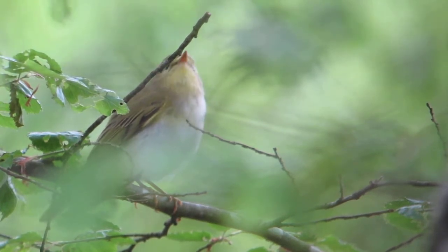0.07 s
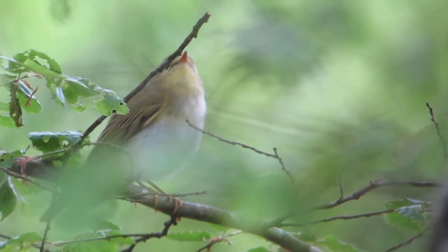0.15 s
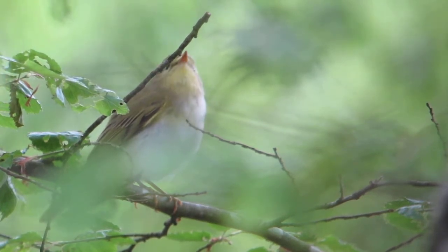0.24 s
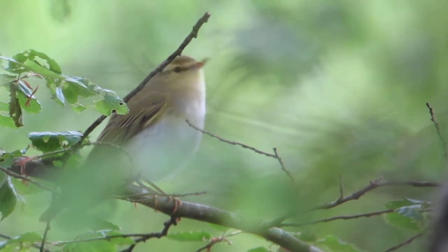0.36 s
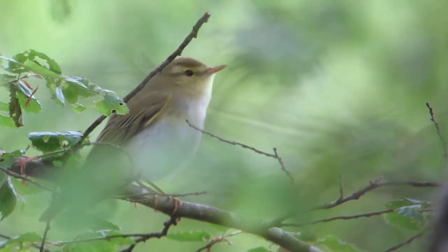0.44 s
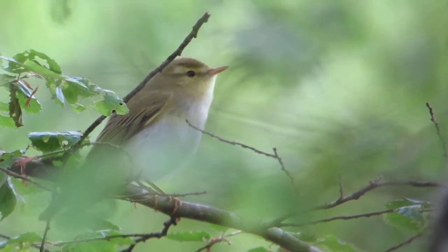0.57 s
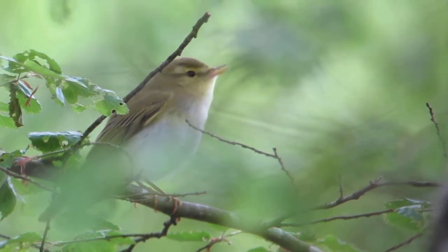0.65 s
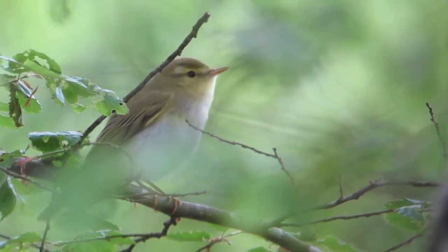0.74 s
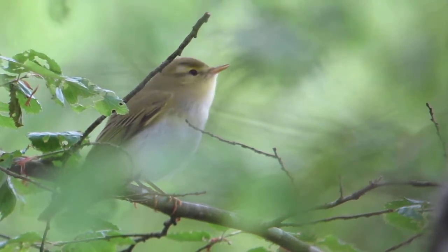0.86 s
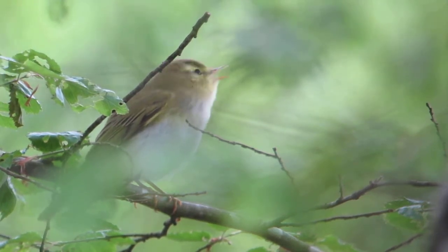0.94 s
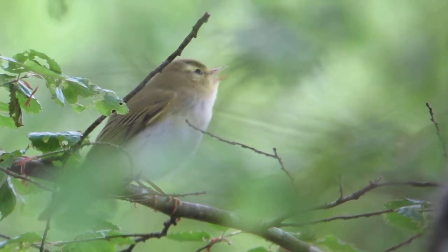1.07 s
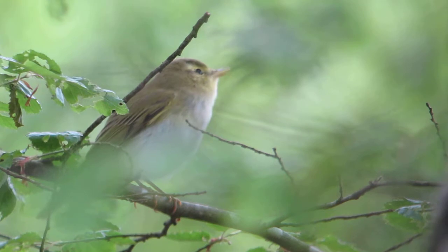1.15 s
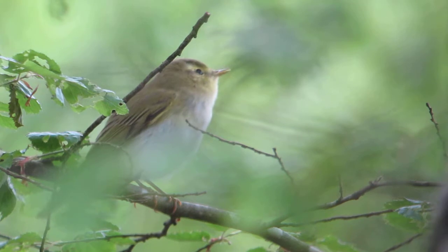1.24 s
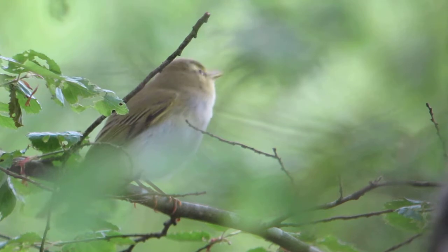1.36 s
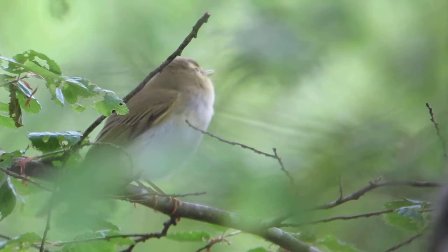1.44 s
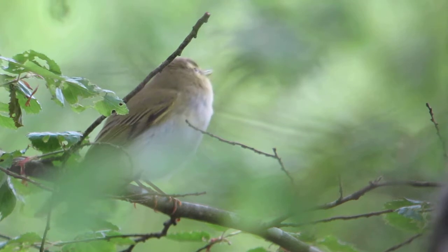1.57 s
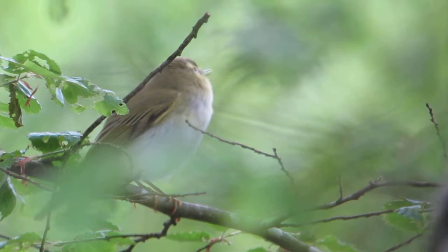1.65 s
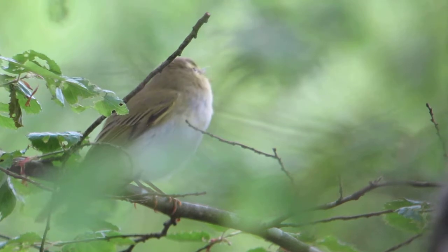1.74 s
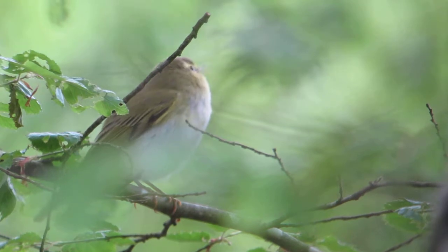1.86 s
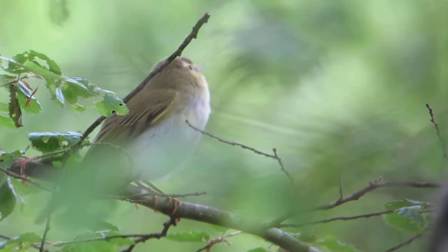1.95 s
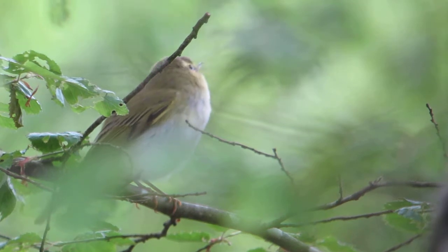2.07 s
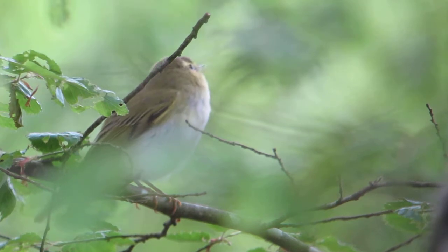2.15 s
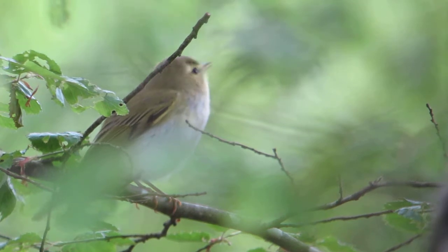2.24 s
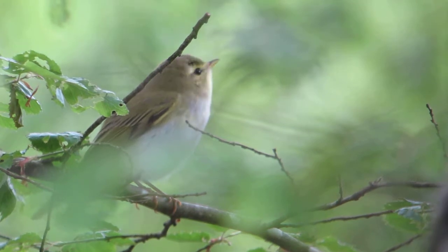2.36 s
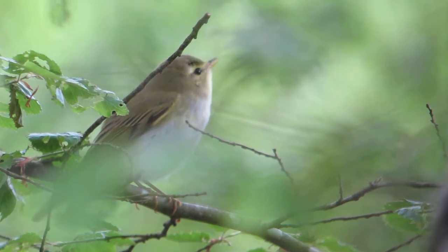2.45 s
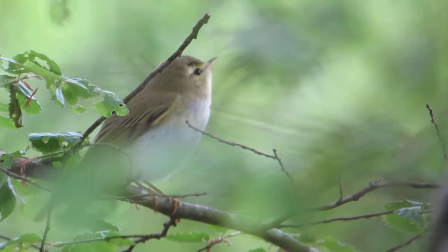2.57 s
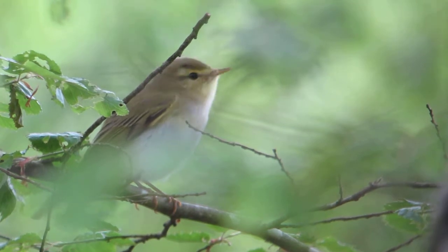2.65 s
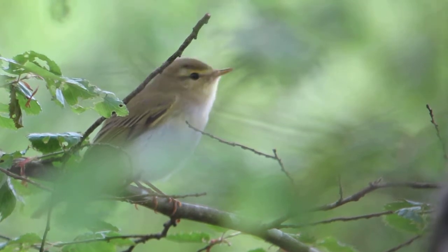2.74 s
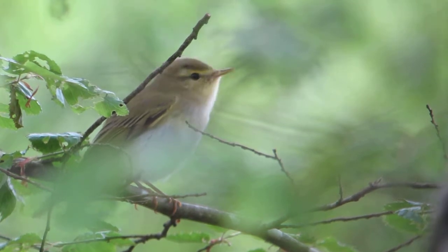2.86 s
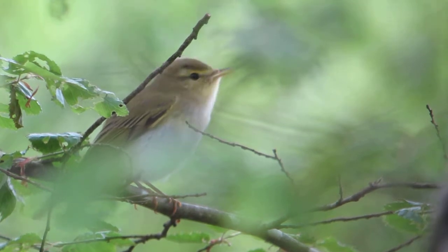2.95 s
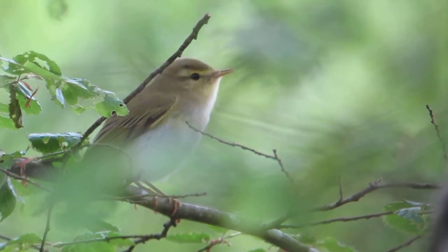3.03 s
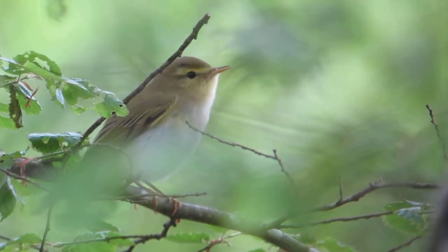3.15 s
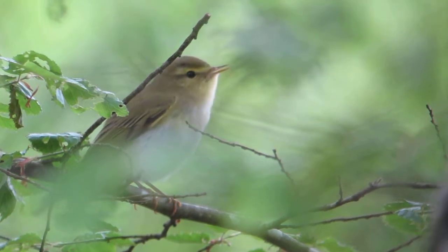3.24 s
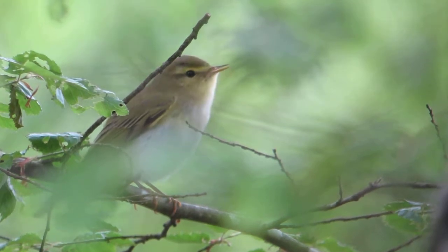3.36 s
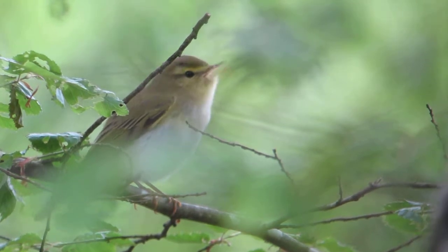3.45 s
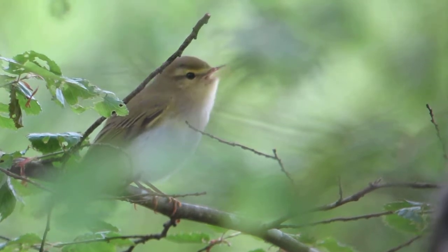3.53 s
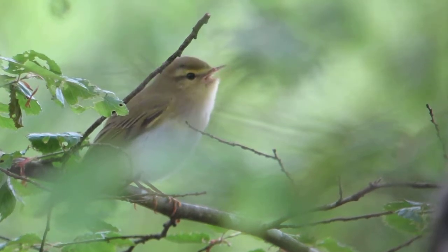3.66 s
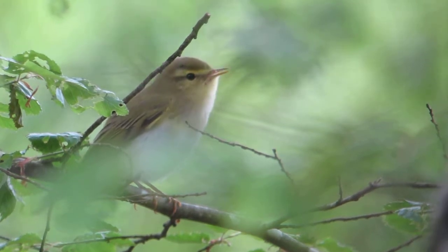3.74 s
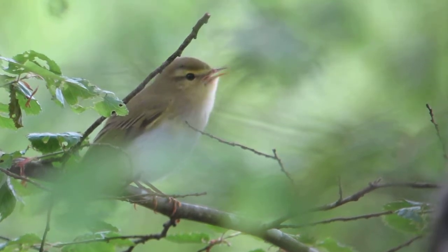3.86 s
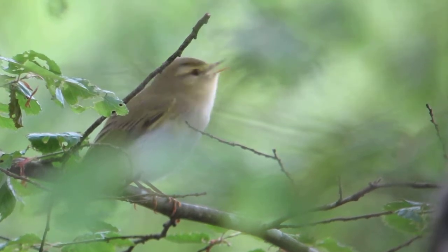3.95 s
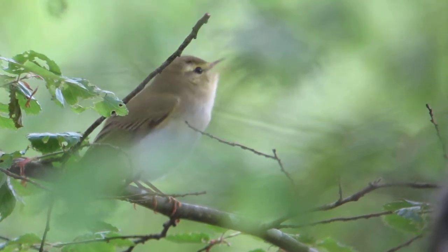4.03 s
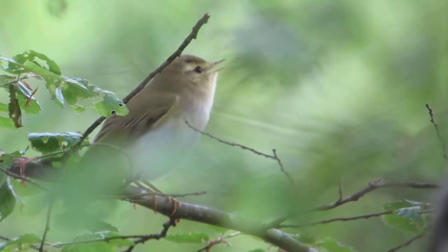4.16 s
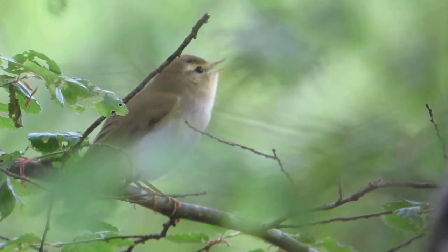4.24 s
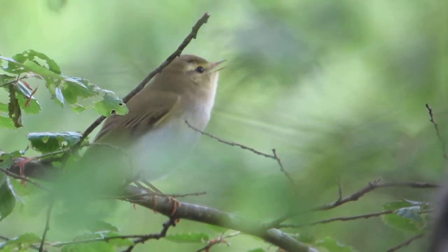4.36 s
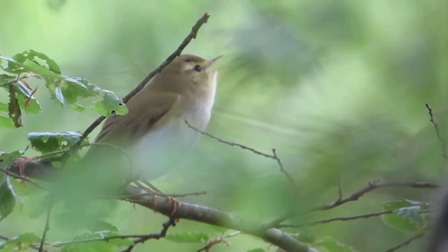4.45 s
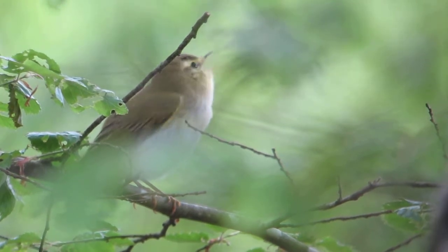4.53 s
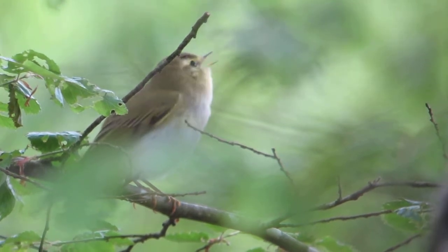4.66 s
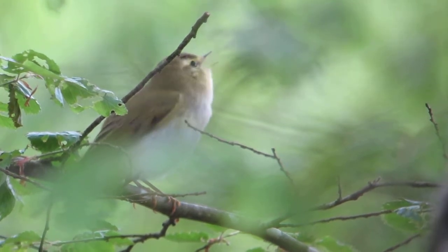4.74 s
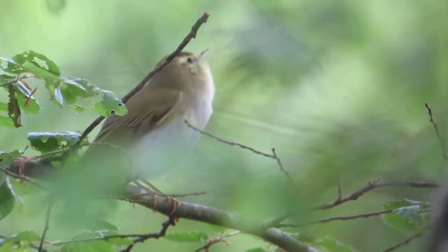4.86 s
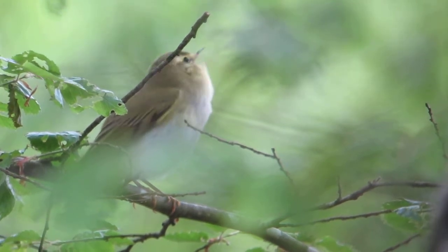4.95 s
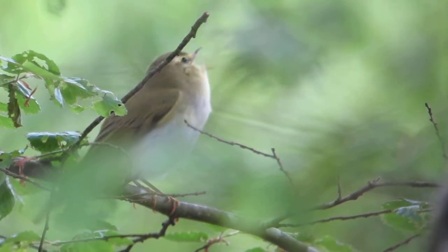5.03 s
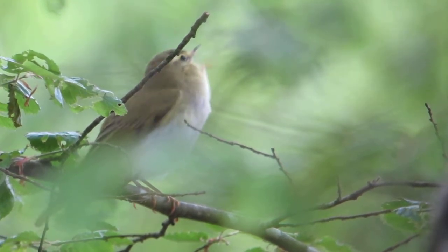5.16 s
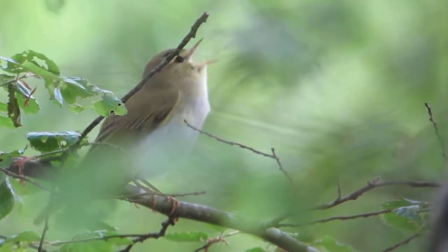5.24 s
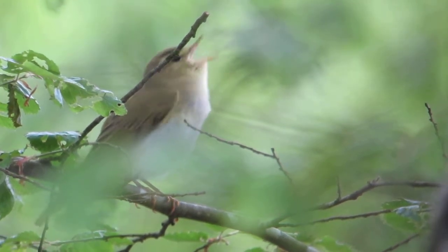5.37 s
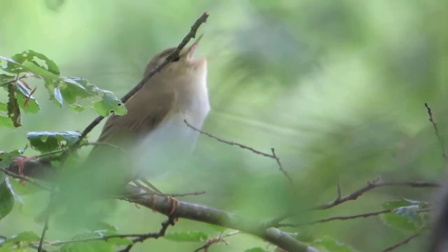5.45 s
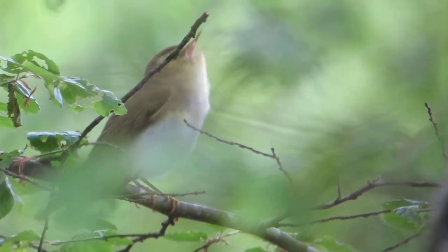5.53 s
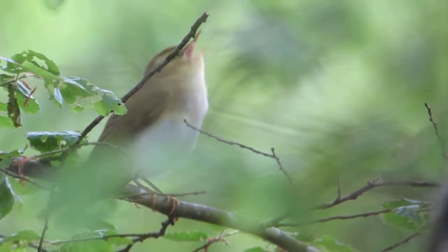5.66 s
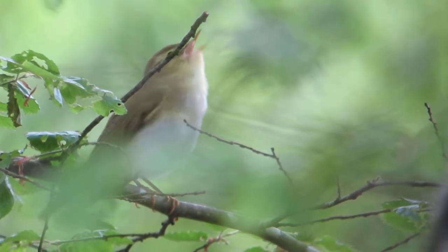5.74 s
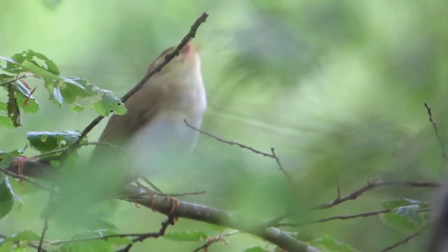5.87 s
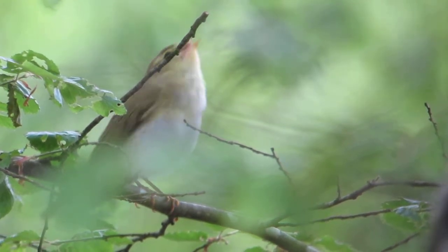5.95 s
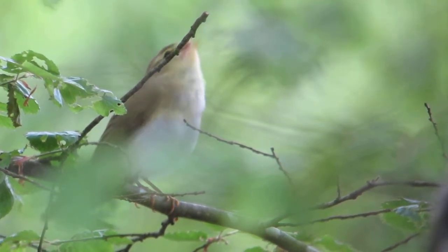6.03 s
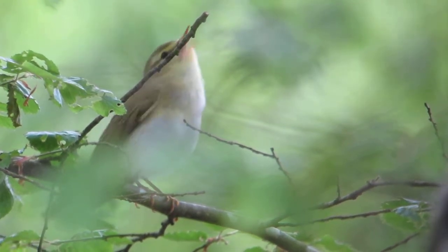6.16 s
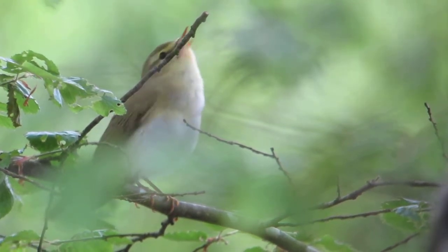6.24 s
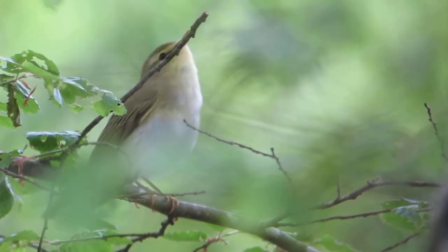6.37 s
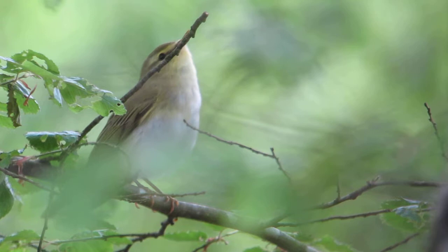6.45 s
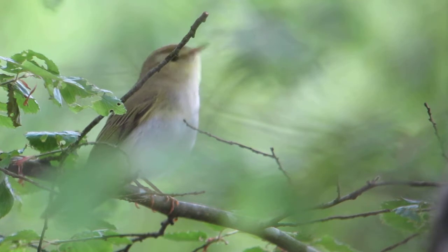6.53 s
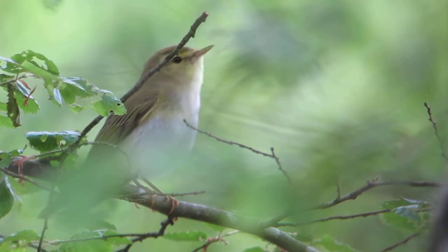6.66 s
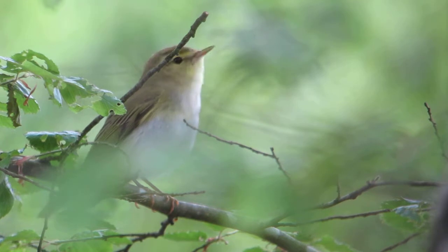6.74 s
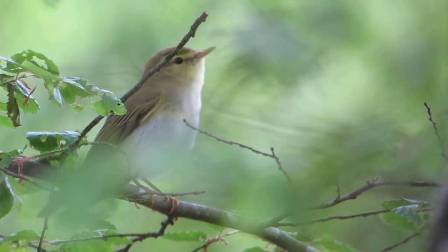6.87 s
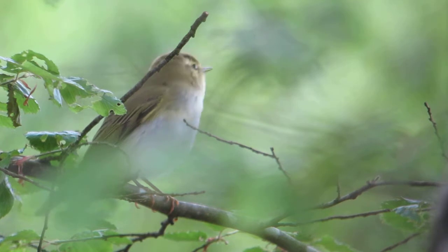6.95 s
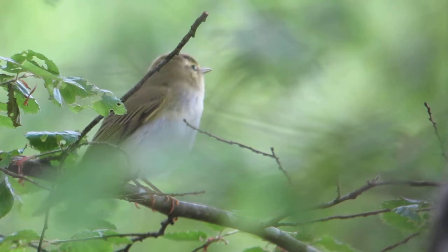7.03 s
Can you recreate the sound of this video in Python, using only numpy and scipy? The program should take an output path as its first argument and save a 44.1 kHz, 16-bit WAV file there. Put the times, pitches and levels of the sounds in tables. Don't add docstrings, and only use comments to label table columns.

```python
import sys
import numpy as np
from scipy import signal
from scipy.fft import rfft, irfft
from scipy.io import wavfile
from scipy.ndimage import uniform_filter1d

SR = 44100
rng = np.random.default_rng(int(sys.argv[2]) if len(sys.argv) > 2 else 0)


def invert_db(x):
    u = np.asarray(x, float) / 20
    return 10 ** u


def output_pcm(signal):
    pcm = np.clip(np.atleast_2d(signal).T, -1, 1) * 32767
    wavfile.write(sys.argv[1], SR, np.round(pcm).astype(np.int16))


N = 313110


def evened(x):
    return x / np.sqrt(np.mean(x ** 2) + 1e-20)


def by(rule, x):
    return np.interp(x, *np.transpose(rule))


def read_each(points, hz):
    f, *columns = np.transpose(points)
    return np.array([np.interp(np.log(hz + 1), np.log(f + 1), column) for column in columns])


def read(points, hz):
    return read_each(points, hz)[0]


def add(mix, s, sound):
    part = mix[round(s * SR):][:len(sound)]
    part += sound[:len(part)]


def coloured(x, db, lead=0):
    turn = np.exp(1j * np.array([lead + 0 * db[0], 0 * db[0]]))
    return irfft(rfft(x) * invert_db(db) * turn, N)


def trees(x, decay, onset_s):
    taps = np.zeros((2, SR))
    at = np.arange(0, SR - 20, 20) + rng.integers(0, 20, (2, SR // 20 - 1))
    size = rng.standard_normal(at.shape) * rng.exponential(1, at.shape) ** 0.62
    np.put_along_axis(taps, at, size, 1)
    hz, t, z = signal.stft(taps, SR, nperseg=256)
    fade = invert_db(-60 * t / read(decay, hz)[:, None])
    tail = signal.istft(z * fade, SR, nperseg=256)[1]
    tail = tail * np.clip(np.arange(tail.shape[1]) / SR / onset_s, 0, 1)
    return signal.fftconvolve(x[None], tail / np.linalg.norm(tail[0]), axes=1)[:, :N]


def glide(t, hz, level_db):
    n = np.arange(0, t[-1], 1 / SR)
    turn = 2 * np.pi * np.cumsum(uniform_filter1d(np.interp(n, t, hz), 90)) / SR
    flutter_db = sum(3.0 * np.sin(2 * np.pi * (rate * n + rng.random())) for rate in (23, 61))
    level = invert_db(np.interp(n, t, level_db) + flutter_db)
    return level * np.sqrt(2) * np.sin(turn) * signal.windows.tukey(len(n), .2)


def hiss(gain, patchy_db):
    # (frequency [Hz], left-right likeness [-1..1])
    likeness = [(40, 0.88), (110, 0.43), (380, 0.44), (1300, 0.23), (2100, 0.54), (2800, -0.12),
                (3500, -0.11), (4800, -0.27), (6200, 0.082), (9000, 0.3), (15000, 0.023)]
    # (frequency [Hz], left minus right [dB])
    lean = [(60, -2.5), (180, 1), (550, -1.0), (1650, 0), (4970, 1), (15000, -1.5)]
    hz = np.fft.rfftfreq(1024, 1 / SR)
    a, b, c, d, patches = rng.standard_normal((N // 256 + 5, 513, 5)).T
    patches = evened(uniform_filter1d(uniform_filter1d(patches, 10, 0), 12, 1))
    same = np.clip(read(likeness, hz), -1, 1)[:, None]
    left = a + 1j * b
    right = same * left + np.sqrt(1 - same ** 2) * (c + 1j * d)
    lean_db = np.outer([.5, -.5], read(lean, hz))[..., None]
    z = np.array([left, right]) * gain(hz)[:, None] * invert_db(patchy_db * patches + lean_db)
    return evened(signal.istft(z, nperseg=1024, noverlap=768)[1][:, :N])


def leaf_hiss():
    # (frequency [Hz], density [dB per Hz])
    wood = [(18, -29), (62, -10), (105, -10.5), (150, -9), (400, -10), (1000, -12.5), (1600, -16.5),
            (2800, -14), (4250, -18.5), (5600, -20), (7600, -31), (9000, -27), (12000, -26.5), (15700, -35)]
    # (low edge [Hz], high edge [Hz])
    gap_hz = (7660, 8580)
    return invert_db(-52.5) * hiss(lambda hz: invert_db(read(wood, hz)) * ((hz < gap_hz[0]) | (hz > gap_hz[1])), 0.83)


def insect_whine():
    # (centre [Hz], width [Hz], level [dB])
    whines = [
        (4814, 460, -49),
        (12270, 110, -80),
    ]
    out = np.zeros((2, N))
    for centre_hz, width_hz, db in whines:
        out += invert_db(db) * hiss(lambda hz: np.exp(-((hz - centre_hz) / width_hz) ** 2 * 2), 1.85)
    return out


def steady_lines():
    # (frequency [Hz], level [dB])
    tones = [
        (8802, -76),
        (8823, -101),
        (12220, -87),
    ]
    t = np.arange(N) / SR
    return sum(invert_db(db + 1.0) * np.sqrt(2) * np.sin(2 * np.pi * (hz * t + rng.random())) for hz, db in tones)


def far_chorus():
    # (time [s], level [dB])
    chorus = [(0, -57), (.55, -64), (1.1, -63), (2.5, -58), (3.5, -66), (6.3, -80), (6.5, -61), (6.78, -62),
              (7.1, -60)]
    blur = hiss(lambda hz: np.exp(-((hz - 2700) / 600) ** 4), 3.5)
    return invert_db(by(chorus, np.arange(N) / SR)) * blur


def wind():
    # (time [s], strength [dB])
    gusts = [(0, -65.5), (3.6, -69), (3.74, -58.5), (3.98, -63.5), (4.1, -59.5), (4.65, -58), (5.14, -62),
             (5.26, -58), (6.08, -60.5), (6.19, -73), (6.26, -58), (7.0, -64), (7.1, -66)]
    # (frequency [Hz], density [dB per Hz])
    gust_colour = [(15, -46), (25, -13), (49, -5), (65, -0.5), (82, -1.5), (110, -25), (173, -8.5),
                   (250, -25), (400, -73)]
    shared, *own = rng.standard_normal((N, 3)).T
    colour_db = read(gust_colour, np.fft.rfftfreq(N, 1 / SR))
    rumble = evened(coloured(shared + 0.25 * np.array(own), np.array([colour_db, colour_db])))
    return invert_db(by(gusts, np.arange(N) / SR) + 0.5) * rumble


def rustles():
    # (time [s], centre [Hz], width [Hz], length [s], level [dB])
    bursts = [(0.651, 2340, 1300, 0.019, -58), (.701, 12500, 4000, .003, -62),
              (.87, 11400, 3000, 0.0024, -69), (0.939, 1970, 450, 0.014, -59),
              (0.955, 4380, 3600, .007, -56), (.943, 5600, 800, .008, -63), (1.413, 2720, 1800, 0.025, -59),
              (1.43, 2610, 900, 0.03, -66), (1.695, 12000, 6000, .004, -58), (2.672, 2500, 1810, 0.02, -58),
              (3.067, 11900, 3000, 0.051, -64.5), (4.813, 1930, 900, .02, -62),
              (6.943, 6770, 2000, 0.0033, -63)]
    out = np.zeros((2, N))
    for s, hz, width_hz, length, db in bursts:
        edges = np.clip([hz - width_hz / 2, hz + width_hz / 2], 100, 19000)
        burst = rng.standard_normal((4000, 2))[:round(length * SR)].T
        burst = burst[0] + 1.7 * burst
        burst = signal.sosfilt(signal.butter(2, edges, "band", fs=SR, output="sos"), burst)
        burst = invert_db(db) * evened(burst) * signal.windows.tukey(burst.shape[1], .6)
        for channel, part in zip(out, burst):
            add(channel, s, part)
    return out


def far_whistler():
    # (time [s], held pitch [Hz], held time [s], level [dB])
    whistles = [
        (1.584, 2590, 0.076, -51),
        (1.793, 2437, 0.055, -50.5),
        (2.186, 2472, 0.055, -50.5),
        (2.415, 2410, 0.057, -50),
        (2.905, 2414, 0.076, -52.5),
        (3.146, 2412, 0.064, -51.5),
    ]
    # (time [s], start [Hz], end [Hz], length [s], level [dB])
    after_notes = [
        (1.681, 2620, 2400, 0.033, -57),
        (1.756, 2603, 2570, 0.028, -61),
        (2.264, 2490, 2383, 0.051, -55),
        (2.32, 2330, 2320, .055, -63),
        (3.029, 2394, 2300, 0.061, -61.5),
        (3.236, 2396, 2400, 0.084, -62.5),
    ]
    hook_hz, hook_hz_per_s, hook_db = 3600, 41000, -10
    calls = np.zeros(N)
    for s, held_hz, held, db in whistles:
        fall = (hook_hz - held_hz) / hook_hz_per_s
        times = [0, 0.84 * fall, fall + 0.0091, fall + held]
        path = [hook_hz, 1.04 * held_hz, held_hz, .99 * held_hz]
        add(calls, s, glide(times, path, [db + hook_db, db - 5.0, db - 3.5, db - 1.0]))
    for s, start_hz, end_hz, length, db in after_notes:
        add(calls, s, glide([0, length], [start_hz, end_hz], [db, db]))
    return calls


def faint_birds():
    # (time [s], start [Hz], end [Hz], length [s], level [dB])
    slurs = [(3.505, 3900, 2800, .034, -65), (3.542, 3150, 3800, .02, -65), (3.638, 3810, 2670, .033, -63),
             (3.672, 3210, 3700, .016, -64), (3.762, 3580, 3640, .016, -61), (3.783, 3300, 2500, .02, -61),
             (3.805, 3200, 3700, .016, -62), (3.9, 3700, 2400, .035, -61), (4.001, 3000, 2280, .021, -63),
             (4.122, 2950, 2270, .022, -65), (4.288, 2300, 3900, .028, -65), (4.42, 3050, 2300, .028, -67),
             (4.572, 3000, 2400, .018, -60), (4.64, 3400, 2700, .014, -65), (4.732, 3650, 2260, .024, -59),
             (4.815, 3500, 2300, .026, -61), (4.906, 3250, 2240, .024, -58), (5.076, 2520, 2250, .026, -63),
             (5.104, 2300, 3100, .022, -67), (5.16, 3000, 2300, .028, -65), (5.188, 2320, 2280, .024, -63)]
    # (time [s], start [Hz], end [Hz], length [s], level [dB])
    chips = [(.632, 5600, 5520, .018, -73), (.626, 2880, 2780, .016, -73), (.65, 3200, 2850, .02, -70),
             (.68, 2950, 2750, .025, -76), (.8, 3300, 3240, .05, -77), (1.15, 3000, 2930, .05, -77),
             (1.397, 5600, 5380, .022, -70), (1.4, 2800, 2600, .02, -72), (1.408, 3150, 3250, .022, -65),
             (1.44, 3150, 3100, .022, -69), (2.657, 5560, 5420, .022, -66), (6.423, 3280, 2700, .03, -68),
             (6.505, 3280, 2800, .028, -69), (6.592, 3250, 2900, .025, -70), (6.665, 3250, 2800, .03, -71),
             (6.678, 2320, 2290, .04, -68), (6.738, 3080, 2980, .03, -65), (6.765, 2400, 2250, .025, -66),
             (6.835, 3000, 2900, .03, -69), (6.92, 3100, 2800, .025, -68), (7.0, 3100, 2200, .03, -68)]
    faint = np.zeros(N)
    for rows in (slurs, chips):
        for s, start_hz, end_hz, length, db in rows:
            add(faint, s, glide([0, length], [start_hz, end_hz], [db, db]))
    return faint


def far_birds():
    # (frequency [Hz], time to fall 60 dB [s])
    far_decay = [(2000, 0.69), (3500, 0.99), (6000, 0.46)]
    calls, faint = far_whistler(), faint_birds()
    left, right = trees(calls + invert_db(-5) * faint, far_decay, 0.0037)
    direct = invert_db([[.8], [-1.5]]) * (calls + invert_db(-1) * faint)
    return direct + invert_db([[-2.5], [-4.5]]) * np.array([left, right - 0.07 * left])


def note(shape, octave, s, level_db, top_hz, slow, low_db=None, side_db=-120., bow_hz=0):
    # (effort [dB], level relative to the note [dB])
    end_chip = [(-50, -32), (-39, -11), (-35.5, -17), (-35, -30)]
    cross_hz = 6500
    ms, *columns = np.transpose(shape)
    ms = np.where(ms > -14, ms * slow, ms + 14 * (1 - slow))
    t = np.arange(ms[0], ms[-1], 1000 / SR)
    hz, db = (uniform_filter1d(np.interp(t, ms, c), 40) for c in columns)
    octave_db = read(octave, hz) - 30 * max(1 - slow, 0)
    stretch = (top_hz - cross_hz) / (hz.max() - cross_hz)
    hz = np.where(hz > cross_hz, cross_hz + (hz - cross_hz) * stretch, hz)
    hz = hz + bow_hz * np.sin(np.pi * np.clip((t + 20) / 28, 0, 1))
    db = db - 2.5 * bow_hz / 650 * np.clip((5800 - hz) / 1200, 0, 1)
    turn = 2 * np.pi * (np.cumsum(hz) / SR + rng.random())
    voice = np.sin(turn) + invert_db(octave_db) * np.sin(2 * turn)
    if low_db is not None:
        db = db + (low_db + 16.5) * np.clip((4400 - hz) / 500, 0, 1)
        chip_hz = 9050 - 150 * (t - 14)
        chip = np.exp(-((t - 14) / 2.3) ** 2) * np.sin(2 * np.pi * np.cumsum(chip_hz) / SR)
        voice += invert_db(by(end_chip, level_db)) * chip
    side = np.sin(turn + 2 * np.pi * 3300 * np.arange(len(t)) / SR)
    side = invert_db(side_db) * side * np.clip((hz - 6900) / 900, 0, 1)
    db = db + 2.14 * np.sin(2 * np.pi * (0.1474 * t + rng.random()))
    sound = np.sqrt(2) * (invert_db(level_db + db) * voice + side) * signal.windows.tukey(len(t), .12)
    return s + ms[0] / 1000, sound


def sips():
    # (time from the crossing [ms], pitch [Hz], level [dB])
    sip_shape = [(-27.5, 2130, -15), (-22.5, 2400, -11), (-16, 3150, -10), (-12.5, 3850, -17),
                 (-10, 4300, -19), (-7.5, 4850, -5), (0, 6450, 0), (5.5, 7064, 3.5), (13, 7420, 2),
                 (21.5, 7400, -12)]
    # (pitch [Hz], relative level [dB])
    sip_octave = [(2000, -16), (3150, -11), (3900, -11), (4350, 3), (4800, -10), (5300, -33), (7400, -34)]
    # (time at the 6500 Hz crossing [s], effort [dB], top [Hz])
    soft_sips = [(0.572, -70, 8500), (0.7277, -67, 8400), (0.878, -63, 8360), (1.0, -65.5, 8300),
                 (1.1248, -62, 8370), (1.24, -60.5, 8270), (1.352, -58, 8300), (1.46, -58.5, 8570),
                 (1.5707, -58, 8300), (1.681, -56.5, 8070), (1.7958, -54, 8040), (1.906, -52.5, 8050),
                 (2.0208, -51.5, 8050), (2.137, -54, 8120), (2.2427, -51.5, 8040), (2.353, -51.5, 8040),
                 (2.4942, -54, 7700), (2.647, -51.5, 7980), (2.8372, -51, 8050), (2.9852, -48.5, 8040),
                 (3.1452, -48, 8080), (3.2762, -47, 7990), (3.3868, -44.5, 8040)]
    # (time at the crossing [s], effort [dB], top [Hz], slowness [ratio], low start [dB])
    full_sips = [(3.495, -39.5, 7950, 0.9, -12), (3.612, -38.5, 7950, .93, -12),
                 (3.737, -36, 7950, 1, -15.5), (3.856, -35, 7880, 1, -14), (3.9665, -33, 7660, 0.93, -15.5),
                 (4.0707, -36, 7680, 0.95, -11.5), (4.174, -36, 7830, 0.99, -11.5),
                 (4.2741, -35.5, 7700, 0.97, -13), (4.3734, -36.5, 7960, 0.99, -12),
                 (4.4765, -35.5, 7600, 0.88, -12), (4.577, -35, 7610, 0.92, -13.5),
                 (4.6797, -34, 7530, .97, -13), (4.7772, -34.5, 7620, 1, -13.5),
                 (4.875, -33.5, 7620, 0.99, -13.5)]
    # (time [s], start [Hz], end [Hz], length [s], level [dB])
    held_top = (4.484, 7400, 7370, .034, -36.5)
    # (effort [dB], slowness [ratio])
    sip_slowness = [(-46, .68), (-40, 0.84)]
    # (effort [dB], low start [dB])
    low_start = [(-61, 3), (-57, -5), (-45, -8.5)]
    # (effort [dB], side tone [dB])
    side_tone = [(-69, -86), (-65, -65), (-55, -65), (-45, -67), (-38, -71)]
    low_joins_s, low_muted_db = 1.3, -24
    song = np.zeros(N)
    s, start_hz, end_hz, length, db = held_top
    add(song, s, glide([0, length], [start_hz, end_hz], [db, db - 5]))
    notes = list(full_sips)
    for s, db, top_hz in soft_sips:
        low_db = by(low_start, db) if s > low_joins_s else low_muted_db
        notes.append((s, db, top_hz, by(sip_slowness, db), low_db))
    for s, db, top_hz, slow, low_db in notes:
        add(song, *note(sip_shape, sip_octave, s, db, top_hz - 150, slow, low_db, by(side_tone, db)))
    return song


def trill():
    # (time from the crossing [ms], pitch [Hz], level [dB])
    trill_shape = [(-26.5, 3530, -22), (-24, 3800, -18.5), (-20, 4150, -21.5), (-18, 4486, -2.5),
                   (-4, 5880, -0.3), (6, 7050, -0.5), (10, 7700, -27), (11.5, 7290, -6.5), (15.5, 6570, -3)]
    # (pitch [Hz], relative level [dB])
    trill_octave = [(3700, -37), (4400, -26), (5240, -47), (6400, -42), (6800, -32), (7300, -30),
                    (7700, -16)]
    # (time at the crossing [s], effort [dB])
    strokes = [(4.9688, -33), (5.033, -32.5), (5.099, -30), (5.164, -30), (5.231, -29), (5.2976, -27.5),
               (5.363, -27.5), (5.4306, -26.5), (5.497, -26.5), (5.565, -25.5), (5.633, -25), (5.6996, -25),
               (5.7686, -25), (5.8386, -25), (5.9069, -25), (5.9773, -24.5), (6.0469, -24.5),
               (6.117, -24.5), (6.1894, -25), (6.261, -26), (6.334, -26.5)]
    # (effort [dB], bow [Hz])
    stroke_bow = [(-34, 650), (-29, 370), (-27, 65)]
    song = np.zeros(N)
    for s, db in strokes:
        slow = np.interp(db, [-33.5, -27.5], [0.95, 0.93])
        add(song, *note(trill_shape, trill_octave, s, db, 7700, slow, bow_hz=by(stroke_bow, db)))
    return song


def warbler():
    # (frequency [Hz], left [dB], right [dB], left lead [rad])
    ports = [(2500, -1, 0, -2), (4480, 3, 1.5, -0.47), (5470, 2.5, -1, -1.2), (6250, -0.5, 1.5, -2),
             (7070, -12, 1, -0.5), (6900, -4, 6, 0.7), (7670, -6, -1, 0.5), (8900, 1.5, 6, 0.92)]
    # (time [s], left minus right [dB])
    head_turn = [(0.5, -7), (0.97, 2), (1.22, 4), (3.19, 2), (3.39, -0.5), (4.54, 2), (5.61, -2),
                 (5.95, -0.5), (6.35, 1.5), (6.5, -13.5)]
    # (delay [ms], left [dB], right [dB])
    leaves = [
        (1.711, -16, -33),
        (3.367, -15, -20),
        (7.505, -30, -12),
        (14.06, -24, -14.5),
        (37, -18.5, -26),
    ]
    # (frequency [Hz], time to fall 60 dB [s])
    near_decay = [(2000, 0.16), (5000, 0.51), (7500, 0.38), (11000, 0.27), (14000, 0.22)]
    # (frequency [Hz], left [dB], right [dB])
    echo_colour = [(2500, -5.5, -21), (3690, 4, 5.5), (4490, -5.5, -2.5), (5100, 6, -1.5), (7100, -4, -2.5),
                   (7740, -2.5, -1.5), (8400, 1, 0.5), (10700, 10, 12)]
    song = sips() + trill()
    hz = np.fft.rfftfreq(N, 1 / SR)
    left_db, right_db, lead = read_each(ports, hz)
    pan_db = by(head_turn, np.arange(N) / SR) + 1.2
    out = coloured(song, np.array([left_db, right_db]), lead) * invert_db(np.outer([.5, -.5], pan_db))
    for ms, *db in leaves:
        out += invert_db(np.c_[db]) * np.roll(song, round(ms * SR / 1000))
    echoes = trees(song, near_decay, 0.0037)
    return out + invert_db(-1.5) * coloured(echoes, read_each(echo_colour, hz))


def scene():
    background = leaf_hiss() + insect_whine() + steady_lines() + far_chorus()
    return background + wind() + invert_db(9.0) * rustles() + invert_db(7.5) * far_birds() + warbler()


def treble_dropouts(mix):
    # (low edge [Hz], high edge [Hz])
    starved_hz = (8050, 10300)
    # (low edge [Hz], high edge [Hz])
    valleys_hz = [
        (3550, 4400),
        (5400, 5950),
    ]
    hz, t, z = signal.stft(mix, SR, nperseg=512)
    loud_db = 10 * np.log10(uniform_filter1d((abs(z) ** 2).sum((0, 1)), size=55))
    chance = rng.random((len(t) // 4 + 1, 16)).repeat(4, 0)[:len(t)].T
    band = np.floor((hz - starved_hz[0]) / (starved_hz[1] - starved_hz[0]) * 4)
    hunger = np.clip((loud_db + 39) / 5, 0, 1) ** 3
    for k in range(4):
        z[:, band == k] *= .75 * chance[0] + .25 * chance[k + 1] > hunger * (.72 - .04 * k)
    for k in range(4, 15):
        z[:, (band == k) & (hz % 560 < 260)] *= chance[k + 1] > .3 * hunger

    deaf = (hz > 8040) & (hz < 8600)
    power = uniform_filter1d((abs(z[:, deaf]) ** 2).sum(0), size=4)
    weak = power < 1.5 * np.median(power) + .0012 * invert_db(2 * loud_db)
    z[:, deaf] *= invert_db(-30 * weak)

    kept = rng.random((len(t) // 10 + 1, len(hz) // 2 + 1)).repeat(10, 0).repeat(2, 1)
    kept = kept[:len(t), :len(hz)].T > .07
    for low, high in valleys_hz:
        valley = (hz > low) & (hz < high)
        z[:, valley] *= kept[valley] | (loud_db > -42)
    z[:, hz > 15790] = 0
    return signal.istft(z, SR, nperseg=512)[1][:, :N]


def low_pass(x):
    return signal.sosfilt(signal.butter(12, 16050, fs=SR, output="sos"), x)


def record(dry):
    mix = treble_dropouts(dry)
    return low_pass(mix)


dry = scene()
out = record(dry)
output_pcm(out)
```